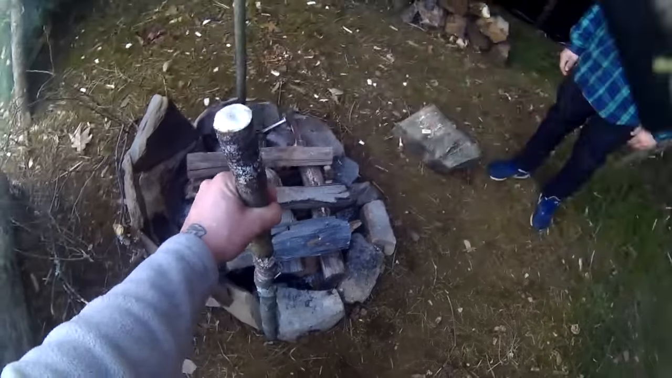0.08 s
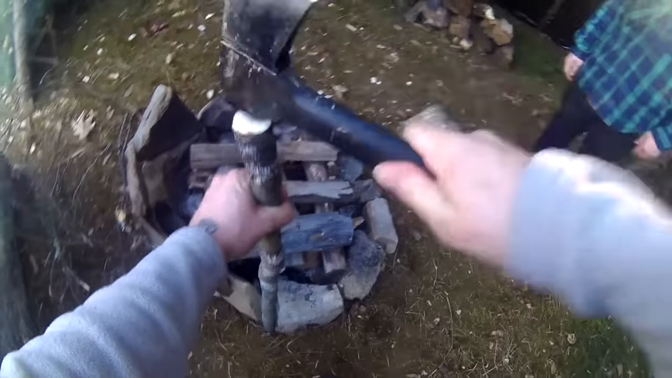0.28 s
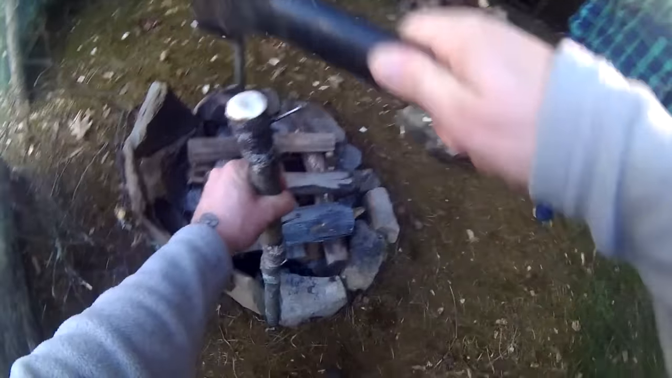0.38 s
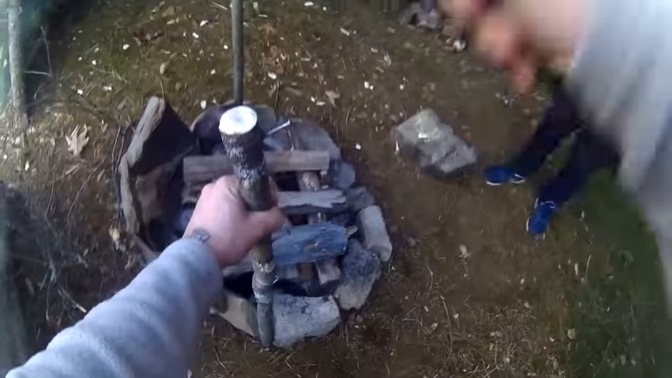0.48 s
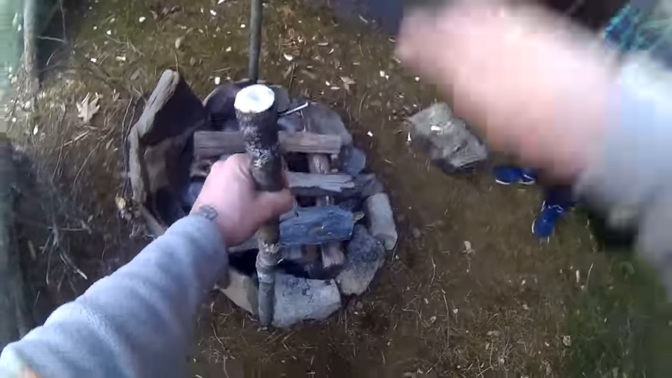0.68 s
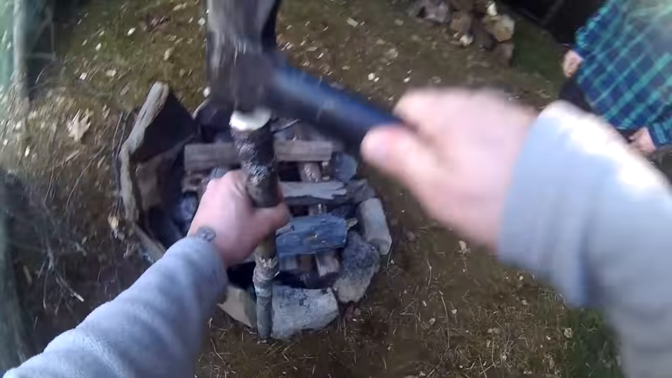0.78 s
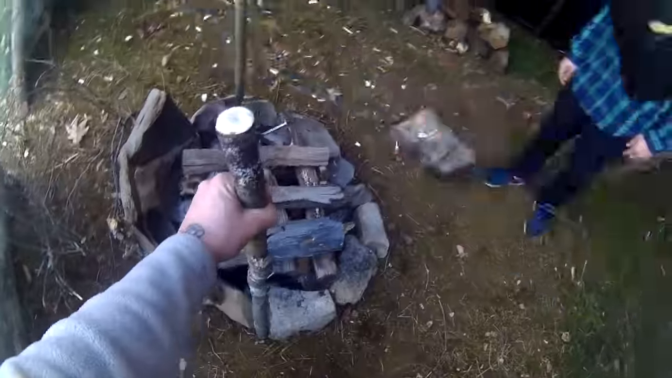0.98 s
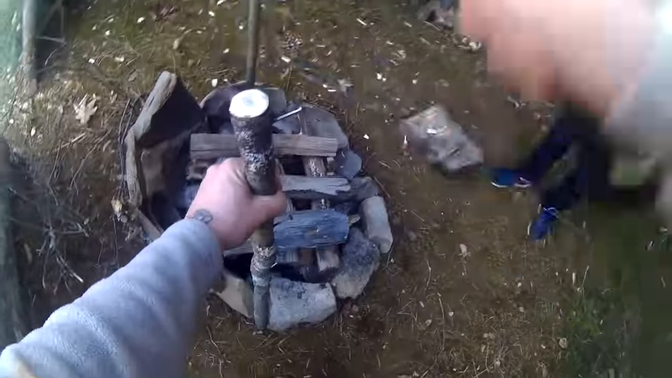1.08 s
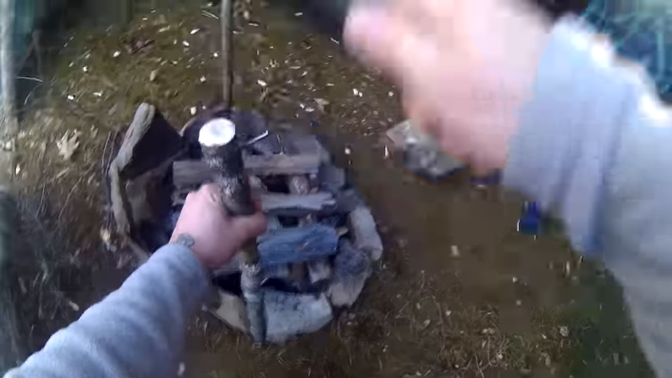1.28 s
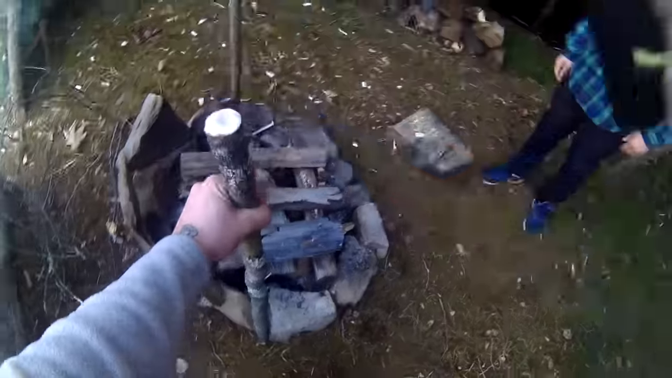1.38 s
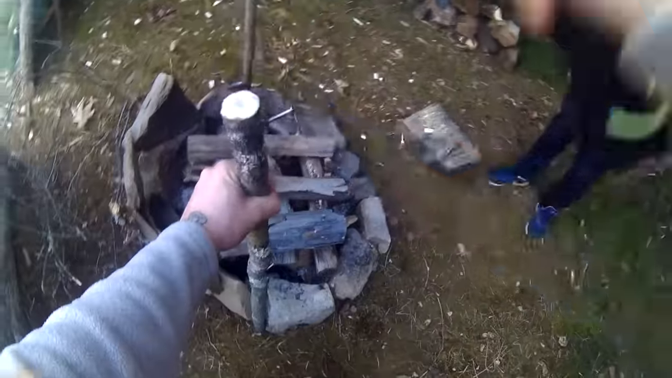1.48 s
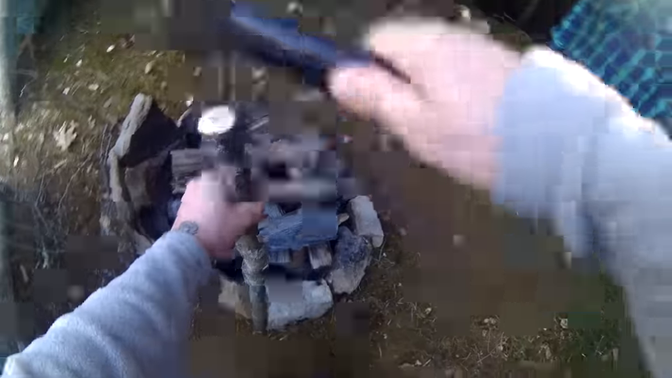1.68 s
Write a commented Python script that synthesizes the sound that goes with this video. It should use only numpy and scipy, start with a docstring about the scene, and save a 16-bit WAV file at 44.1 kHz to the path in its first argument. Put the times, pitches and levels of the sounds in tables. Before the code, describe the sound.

A hatchet's back pounds a wooden stake in four sharp knocks, at about 0.2, 0.6, 1.1 and 1.5 seconds, heard outdoors at arm's length. Each is a bright tick and short woody crack over a dull thud, with a faint echo. A soft bump follows each of the last two blows. Underneath lie a light air rumble, hiss, very faint high chirps and a thin whine.

```python
"""Outdoors, at arm's length: the back of a hatchet drives a hand-held wooden stake in four sharp knocks.
Each blow is a tick of steel on wood, a short crack and a damped ring over a dull thud in the soil;
the surroundings answer faintly. A soft bump follows each of the last two blows.
Underneath lie a light rumble of air, hiss, faint chirps and a thin high whine."""
import sys
import numpy as np
from scipy import signal
from scipy.fft import rfft, irfft
from scipy.io import wavfile

SR = 44100
rng = np.random.default_rng(int(sys.argv[2]) if len(sys.argv) > 2 else 0)


def transcribe(signal):
    """Save signal, clipped to [-1, 1], as a 16-bit WAV file at the path in sys.argv[1]."""
    frames = np.atleast_2d(signal).T
    limited = np.clip(frames, -1, 1)
    pcm = np.round(limited * 32767).astype(np.int16)
    wavfile.write(sys.argv[1], SR, pcm)


N = 77175

# Bed of still air and hiss. Each row: frequency in Hz, spectral level in dB.
AIR_SPECTRUM = [(20, 3), (35, -9), (60, -9.5), (110, -18.5), (200, -21), (400, -28.5), (800, -33),
                (1600, -34.5), (3000, -39), (6000, -42), (9500, -43), (10000, -40.5), (10600, -41),
                (16000, -46.5)]
# Electronic whine. Each row: pitch in Hz, level in dB.
WHINE_TONES = [(9981, -82), (10057, -82.5)]
# High chirps. Each row: peak time in seconds, level in dB.
CHIRPS = [(.012, -75), (.382, -89), (.975, -74), (1.318, -75.5), (1.58, -85)]
# Hatchet blows. Each row: start in seconds, level in dB, ring brightness in dB per octave,
# tick trim in dB, tick cutoff in Hz, thud trim in dB, far scatter trim in dB.
BLOWS = [(.2321, 0.9, -0.2, 0, 15000, -5.5, 0.5), (0.6465, -0.94, -2, -3.5, 12500, -2, -4),
         (1.067, -0.44, -2, -4.5, 10800, -0.5, 3), (1.486, -0.4, 0.5, -7.5, 14500, -0.5, 0)]
# Tick of steel on wood. Each row: frequency in Hz, spectral level in dB.
TICK_SPECTRUM = [(300, -7), (2000, -0.5), (3300, -7.5), (4300, 7.5), (5000, -10), (6000, -3), (6600, -10),
                 (7500, -5.5), (10800, -8), (12200, -15), (16000, -11.5)]
# What a blow sets ringing: the stake, its thud in the soil, a faint after-ring (likely the hatchet
# head) and a low jolt. Each row: pitch in Hz, level in dB, time to fall 60 dB in seconds.
STAKE_MODES = [(1122, -13.8, .03), (1379, -7.4, .017), (1489, -14.4, .034), (1573, -36, .05),
               (1742, -7, .014), (1752, -19.5, .058), (1882, -14, .01), (2070, -21.9, .04),
               (2198, -34, .05), (2414, -14.8, .027), (2539, -25.5, .05), (2753, -13.2, .025),
               (2838, -15.2, .029), (3023, -24, .042), (3618, -21.6, .018), (3850, -31, .028),
               (4427, -11.9, .015), (4556, -16, .017), (4646, -30, .034), (5215, -33, .03),
               (5643, -19, .011), (6071, -23.6, .014)]
THUD_MODES = [(287, -45.5, 0.057), (445, -50, .025), (557, -49, 0.01), (736, -46, 0.021), (935, -32, .025)]
HEAD_MODES = [(1362, -51.5, .32), (1746, -53, .28), (2290, -56, .15), (2460, -57, .2), (4480, -52, .13)]
JOLT_MODES = [(40.4, -55, .2), (90, -58.5, .08)]
# Slaps off the ground and nearby things. Each row: delay in seconds, gain in dB.
ECHOES = [(.0068, -27.5), (0.022, -29.5)]
# Scatter from the surroundings, near and far. Each row: frequency in Hz, spectral level in dB.
NEAR_SPECTRUM = [(200, -14.5), (900, -14), (1300, -0.5), (1750, 6), (2000, -5.5), (2450, 2), (3300, -8.5),
                 (4500, -8), (6000, -15), (8000, -23), (14000, -37)]
FAR_SPECTRUM = [(200, -13.5), (1000, -8), (1350, 3), (1750, 7), (2100, -6), (2600, -7.5), (4500, -19),
                (12000, -33.5)]
# Soft bumps. Each row: start in seconds, trim in dB.
BUMPS = [(1.1459, 2), (1.5644, 2)]

TICK_LEAD_S, SETTLE_DELAY_S, NEAR_DELAY_S, FAR_DELAY_S = .0002, .029, .011, .08
BRIGHT_PIVOT_HZ, BAND_TOP_HZ = 1800, 16400


def amp(db):
    """Decibels to gain."""
    return 10 ** (np.asarray(db) / 20)


def unit(x):
    """Scales to rms 1."""
    return x / np.sqrt(np.mean(x ** 2) + 1e-20)


def add(mix, start_s, sound):
    """Lays a sound into the mix."""
    part = mix[max(round(start_s * SR), 0):][:len(sound)]
    part += sound[:len(part)]


def noise(n, spectrum):
    """Noise at rms 1, coloured by a curve of (Hz, dB) points."""
    points_hz, points_db = np.transpose(spectrum)
    hz = np.fft.rfftfreq(n, 1 / SR)
    curve_db = np.interp(np.log(hz + 1), np.log(points_hz + 1), points_db)
    return unit(irfft(rfft(rng.standard_normal(n)) * amp(curve_db), n))


def cut(x, hz, kind, order):
    """Butterworth high-pass or low-pass."""
    return signal.sosfilt(signal.butter(order, hz, kind, fs=SR, output="sos"), x)


def fade(t, t60):
    """Exponential decay by 60 dB in t60 seconds."""
    return np.exp(-np.log(1000) * t / t60)


def pulse(t, hz, width_s):
    """A burst of a cycle or two around t = 0."""
    return np.exp(-(t / width_s) ** 2) * np.cos(2 * np.pi * hz * t)


def ring(modes, t, bright_db=0, detune=.002, rise_s=.002):
    """Damped modes, struck together; the grip detunes them a little at each blow."""
    hz, db, t60 = np.transpose(modes)[:, :, None]
    hz = hz * (1 + detune * rng.standard_normal(hz.shape))
    gain = amp(db + bright_db * np.log2(hz / BRIGHT_PIVOT_HZ))
    partials = gain * fade(t, t60) * np.sin(2 * np.pi * hz * t)
    return partials.sum(0) * (1 - np.exp(-t / rise_s))


def air(gust_db=2.5, gust_s=.15):
    """Steady hiss over a rumble that swells as the air moves."""
    bed = noise(N, AIR_SPECTRUM)
    rumble = cut(bed, 150, "low", order=1)
    gust = unit(cut(rng.standard_normal(N), .5 / gust_s, "low", order=2))
    return amp(-56) * (bed + rumble * (amp(gust_db * gust) - 1))


def whine(t):
    """A thin electronic whine of two close tones."""
    return sum(amp(db) * np.sin(2 * np.pi * (hz * t + rng.random())) for hz, db in WHINE_TONES)


def chirps(t, pitch_hz=9150, width_s=.022):
    """Short, soft swells of a narrow high band, perhaps a distant insect."""
    flutter = cut(rng.standard_normal(N), 400, "low", order=3)
    buzz = unit(flutter * np.sin(2 * np.pi * pitch_hz * t))
    return buzz * sum(amp(db) * np.exp(-((t - peak_s) / width_s) ** 2) for peak_s, db in CHIRPS)


def tick(t, top_hz):
    """Steel meets wood in a bright snap of noise."""
    snap = noise(len(t), TICK_SPECTRUM) * fade(t, t60=.013)
    return amp(-20.5) * cut(snap, top_hz, "low", order=4)


def stake(t, bright_db):
    """Crack and ring of the wood; the thin stake radiates little below its first strong mode."""
    crack = amp(-7.5) * pulse(t - .0016, hz=1780, width_s=.0007)
    return cut(crack + ring(STAKE_MODES, t, bright_db), 830, "high", order=6)


def soil_thud(t):
    """The stake thuds in the soil, and the blow pushes out one short puff of air."""
    puff = amp(-32) * pulse(t - .0017, hz=506, width_s=.0014)
    return ring(THUD_MODES, t) + puff


def blows():
    """The hatchet strikes: tick on top, ringing wood as the body, thud below, scatter as the tail."""
    out, t = np.zeros(N), np.arange(SR // 2) / SR
    for start_s, db, bright_db, tick_db, tick_top_hz, thud_db, far_db in BLOWS:
        add(out, start_s - TICK_LEAD_S, amp(tick_db) * tick(t, tick_top_hz))
        thud = amp(thud_db) * soil_thud(t)
        body = stake(t, bright_db) + ring(HEAD_MODES, t) + ring(JOLT_MODES, t)
        add(out, start_s, amp(db) * body + thud)
        settle = amp(-13) * cut(thud, 416, "low", order=2)  # the foot of the stake beds in
        add(out, start_s + SETTLE_DELAY_S, settle)
        add(out, start_s + NEAR_DELAY_S, scatter(t, NEAR_SPECTRUM, db - 46, t60=.16))
        add(out, start_s + FAR_DELAY_S, scatter(t, FAR_SPECTRUM, far_db - 69, t60=.7))
    return out


def echoes(hits):
    """The ground and nearby things throw back single, dulled slaps."""
    out, dulled = np.zeros(N), cut(hits, 2600, "low", order=2)
    for delay_s, db in ECHOES:
        add(out, delay_s, amp(db) * dulled)
    return out


def scatter(t, spectrum, db, t60):
    """Many small echoes blur into a diffuse tail."""
    return amp(db) * noise(len(t), spectrum) * fade(t, t60)


def bumps(turn_s=.0044, width_s=.0008):
    """A muffled touch on the wood, then a low push that swings back."""
    out, t = np.zeros(N), np.arange(SR // 5) / SR
    since_turn = t - turn_s
    swell = np.exp(-(since_turn / width_s / 2) ** 2)
    envelope = np.where(since_turn < 0, swell, fade(abs(since_turn), t60=.036))
    push = -amp(-40.5) * np.tanh(2 * since_turn / width_s) * envelope
    for start_s, db in BUMPS:
        touch = amp(-35) * cut(stake(t, bright_db=0), 2350, "low", order=8)
        add(out, start_s, amp(db) * (touch + push))
    return out


def scene():
    """Knocks, bumps and their echoes over the quiet outdoor bed, in mono."""
    t = np.arange(N) / SR
    hits = blows() + bumps()
    return (air() + whine(t) + chirps(t) + hits + echoes(hits))[None]


def record(dry):
    """A steep low-pass shaves off the very top of the mix."""
    lowpass = signal.firwin(255, BAND_TOP_HZ, window=("kaiser", 9), fs=SR)
    return signal.oaconvolve(dry, lowpass[None], "same")


dry = scene()
out = record(dry)
transcribe(out)
```